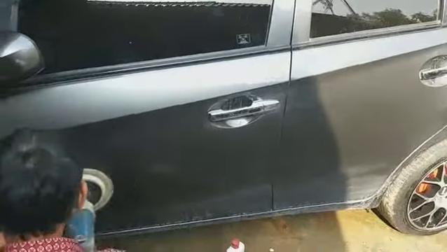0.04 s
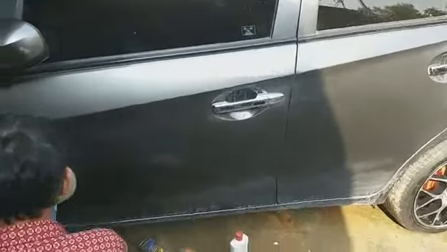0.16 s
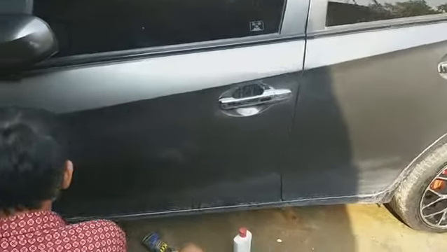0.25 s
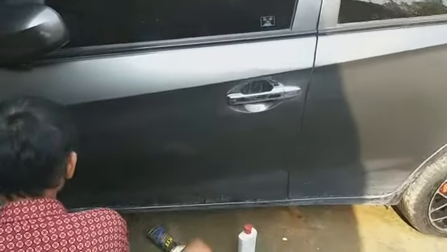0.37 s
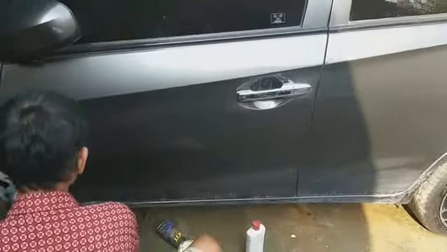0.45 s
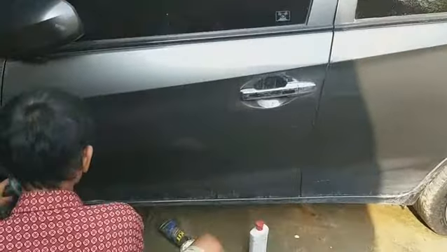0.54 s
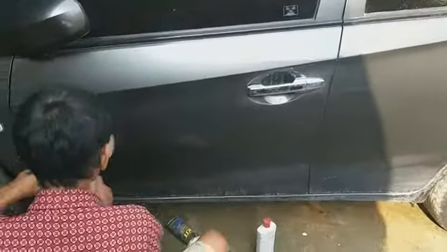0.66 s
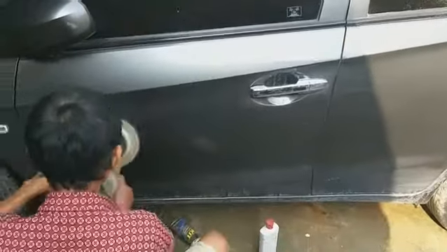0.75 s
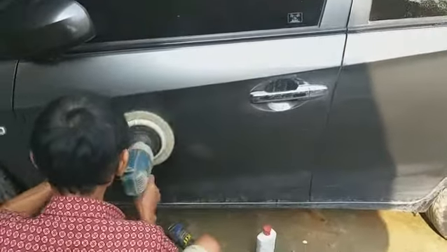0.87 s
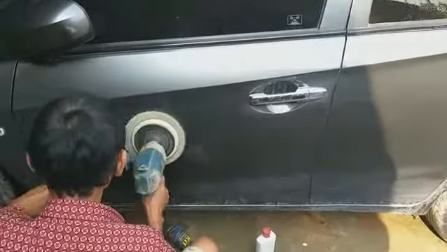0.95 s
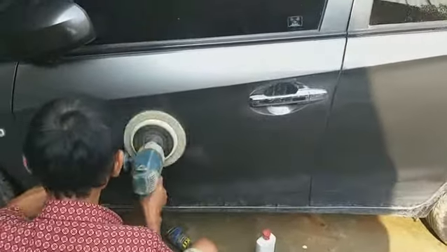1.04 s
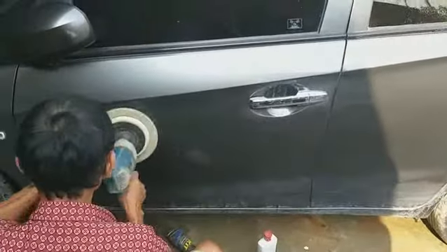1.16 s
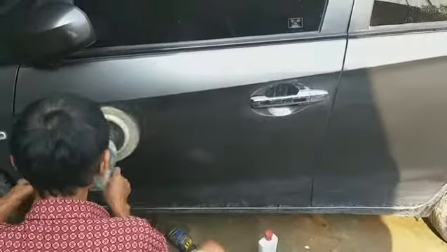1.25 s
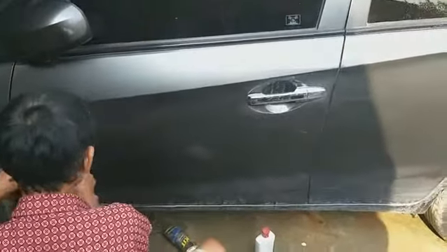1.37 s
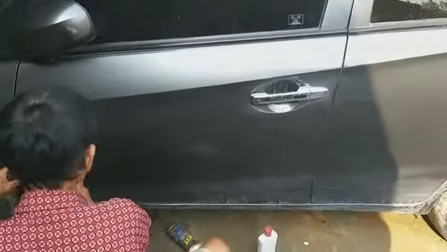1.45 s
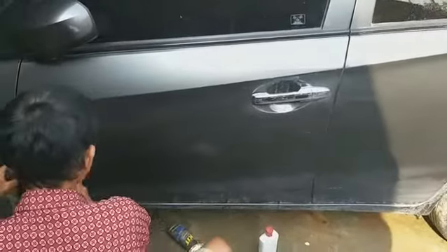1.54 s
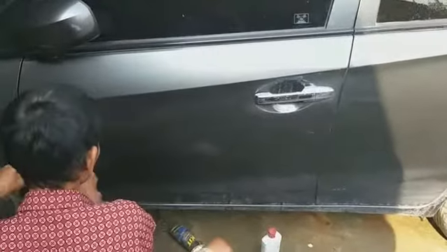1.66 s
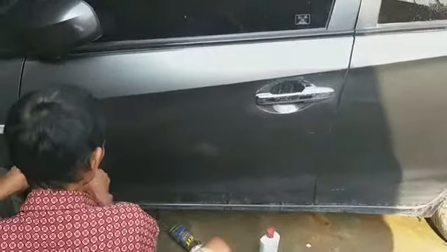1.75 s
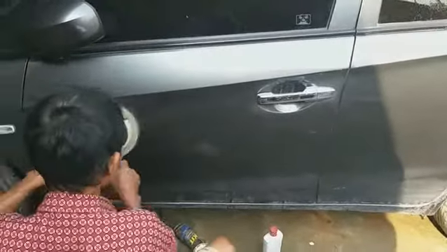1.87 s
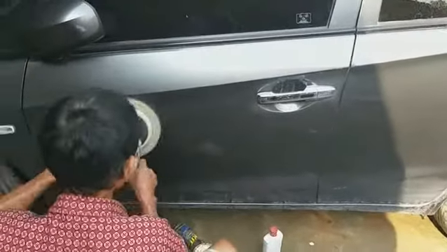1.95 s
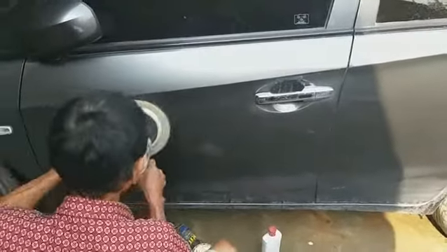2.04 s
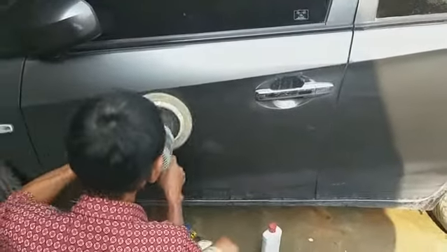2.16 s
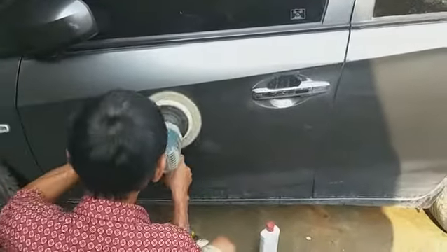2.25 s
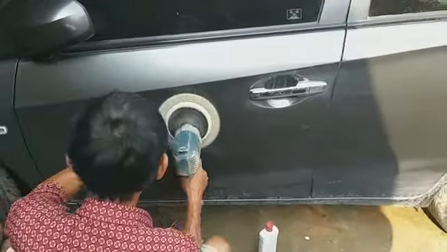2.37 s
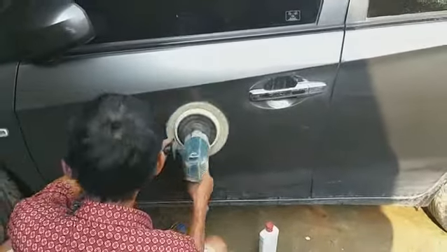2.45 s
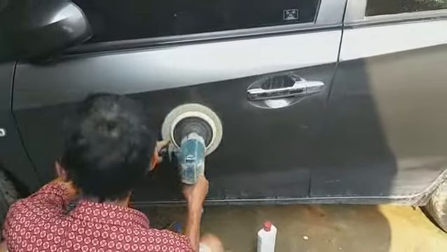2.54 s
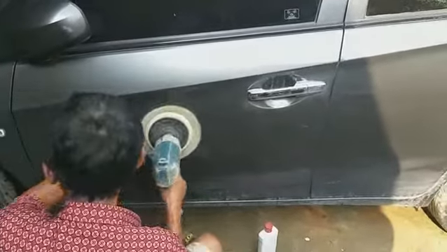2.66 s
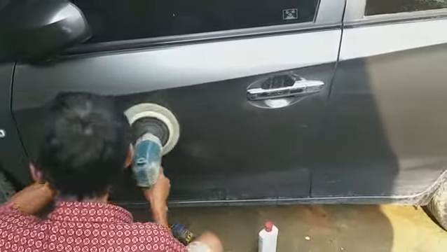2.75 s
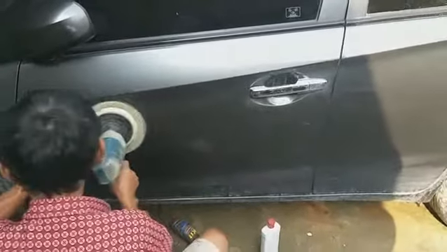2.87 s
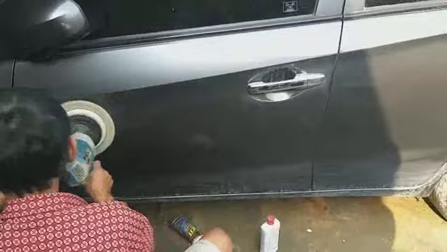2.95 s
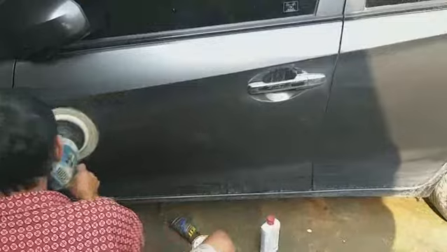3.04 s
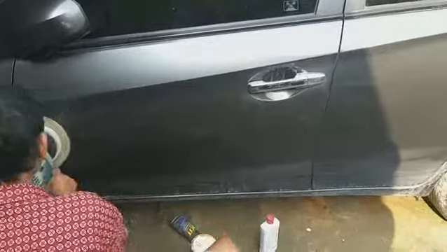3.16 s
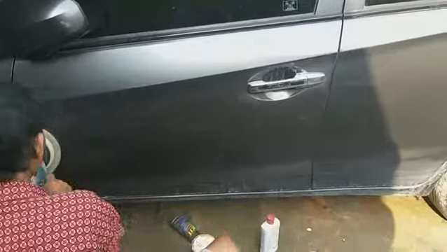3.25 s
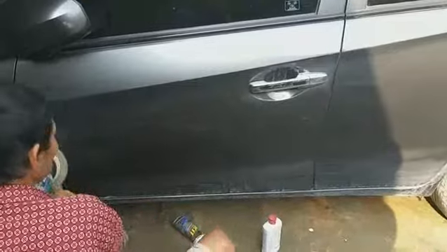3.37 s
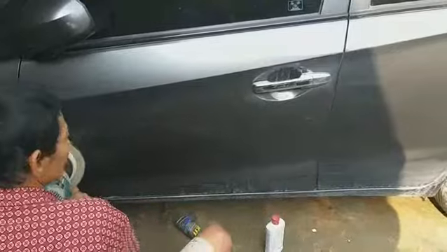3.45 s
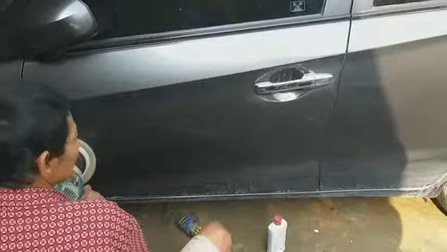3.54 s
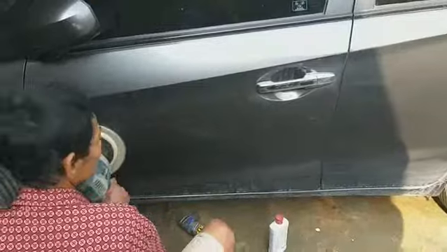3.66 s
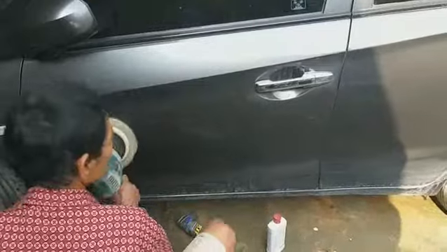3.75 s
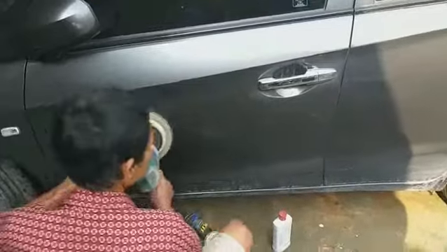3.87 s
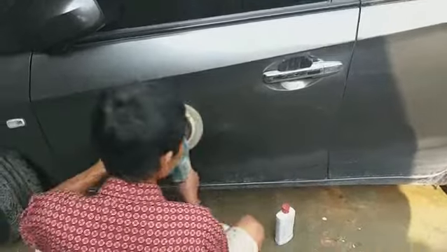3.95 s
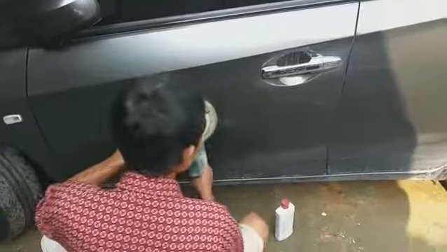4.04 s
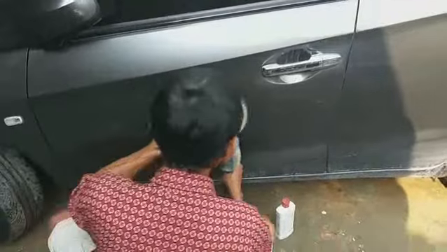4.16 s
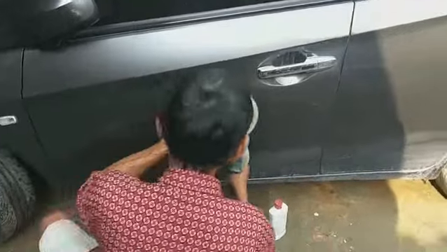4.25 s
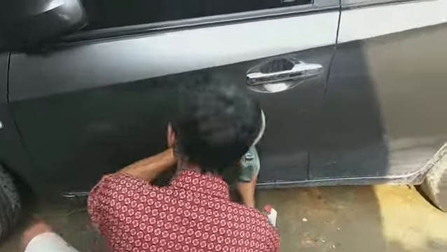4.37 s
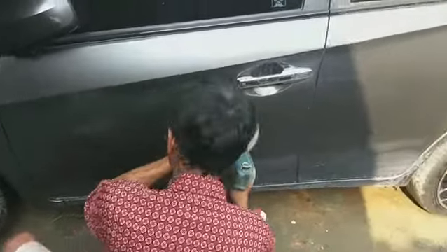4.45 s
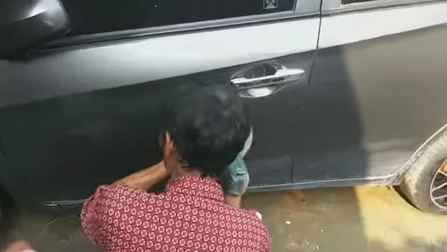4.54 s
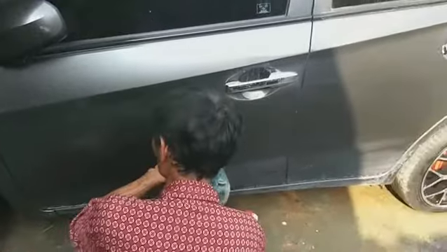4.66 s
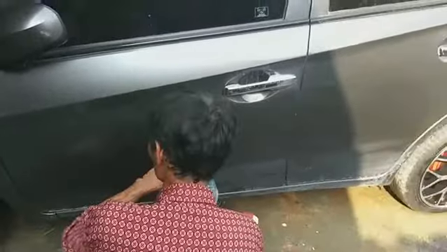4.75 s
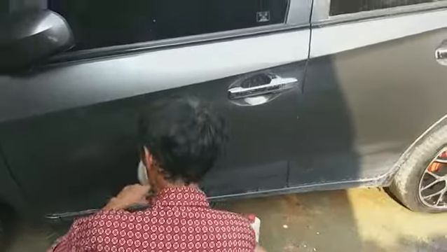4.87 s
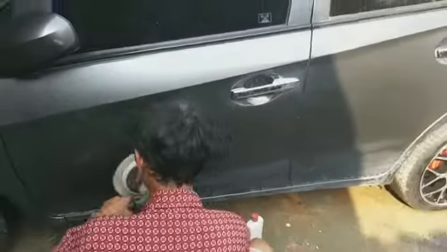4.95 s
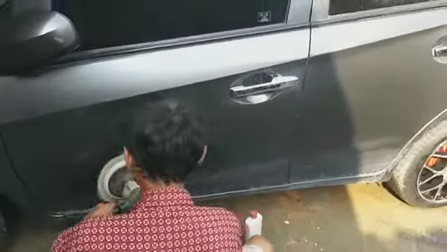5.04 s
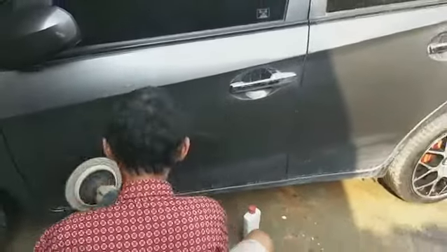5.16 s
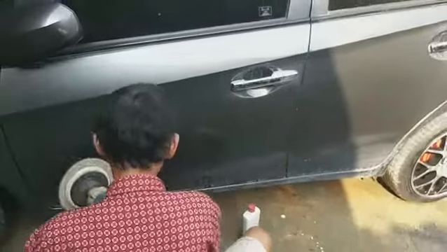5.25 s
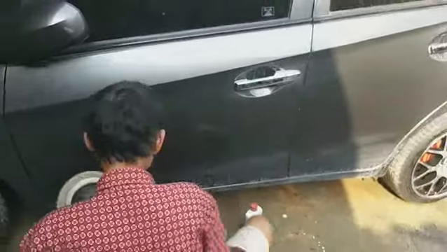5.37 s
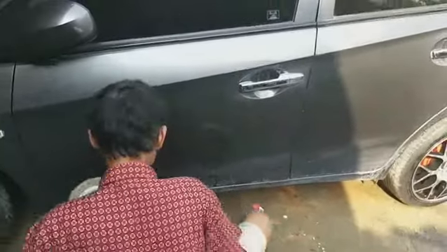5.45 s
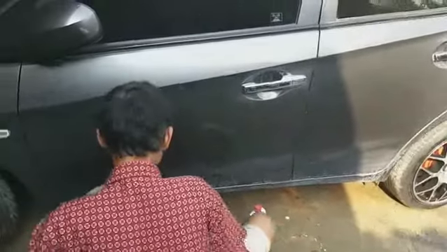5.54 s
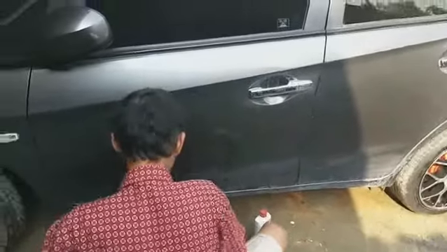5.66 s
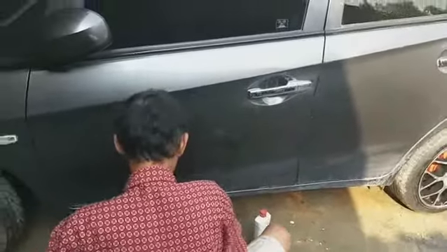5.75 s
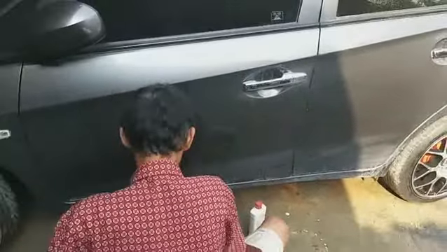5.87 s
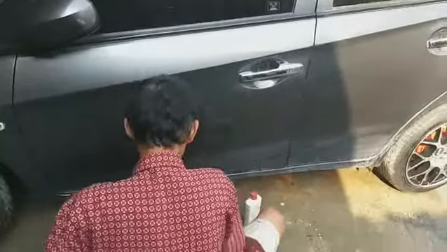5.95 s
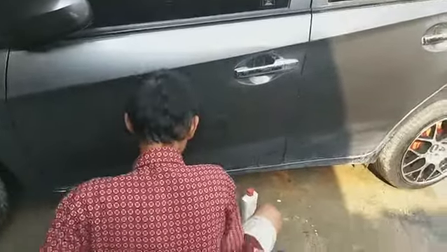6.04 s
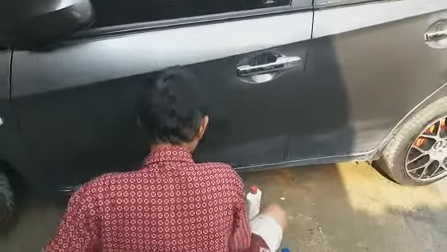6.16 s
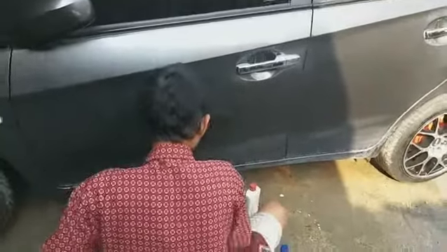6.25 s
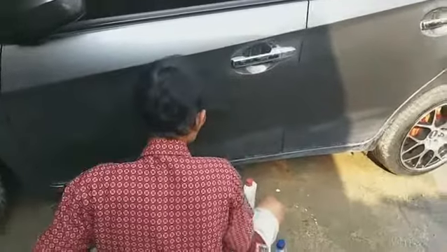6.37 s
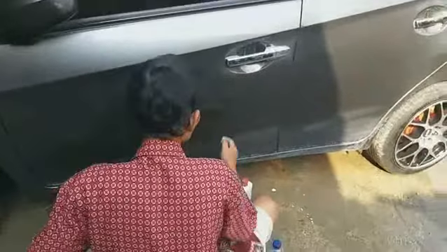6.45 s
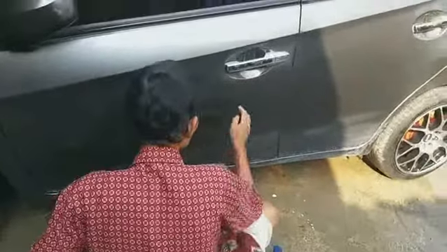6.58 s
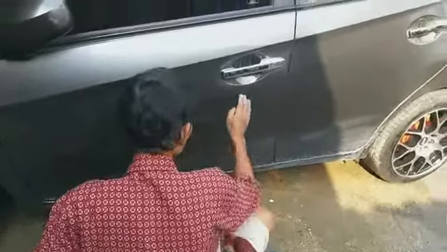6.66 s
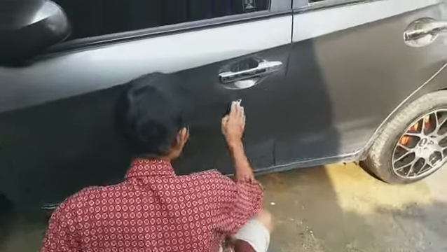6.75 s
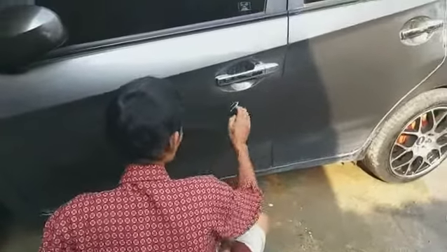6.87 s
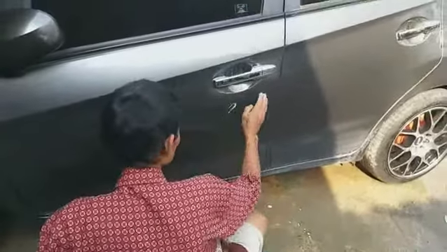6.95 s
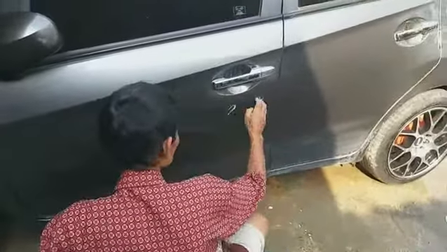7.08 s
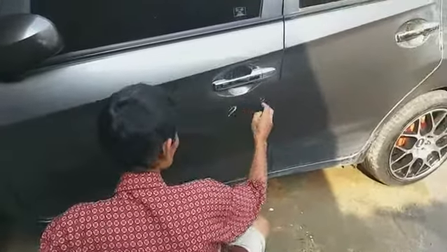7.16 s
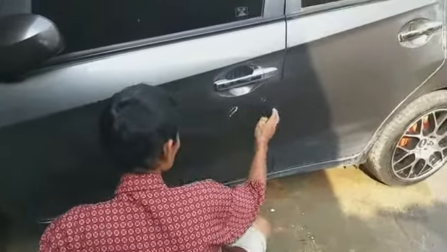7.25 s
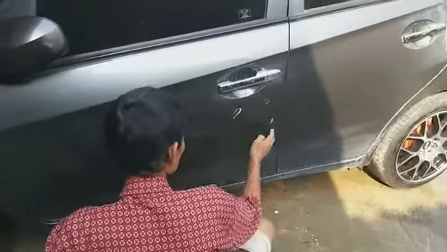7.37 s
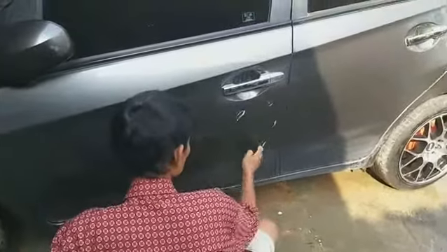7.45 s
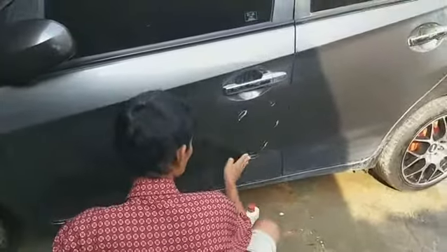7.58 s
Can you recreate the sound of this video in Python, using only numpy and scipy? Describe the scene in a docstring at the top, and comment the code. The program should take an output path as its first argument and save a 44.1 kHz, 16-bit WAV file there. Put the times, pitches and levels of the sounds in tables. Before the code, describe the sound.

An electric rotary polisher whines and hisses against a car door outdoors, its pitch wavering, then switches off and slowly runs down.

```python
"""An electric rotary polisher whines and hisses on a car door outdoors, then is switched off and runs down.
Its armature drives a bevel gear: teeth, slots and bearing sing at multiples of the shaft speed. Fan air and pad
friction are shaped noise that rings in the housing; a hollow noise band glides and a small knock comes late.
Two far engines, hums and street rumble lie behind; the microphones sit close together, so the stereo is narrow."""
import sys
import numpy as np
from scipy import signal
from scipy.fft import rfft, irfft, next_fast_len
from scipy.io import wavfile
from scipy.ndimage import uniform_filter1d, map_coordinates

SR = 44100
rng = np.random.default_rng(int(sys.argv[2]) if len(sys.argv) > 2 else 0)


def output_pcm(signal):
    """Save a mono or channel-first signal as 16-bit PCM at the path in sys.argv[1].

    Samples are clipped to [-1, 1] before scaling.
    """
    pcm = np.clip(np.atleast_2d(signal).T, -1, 1) * 32767
    wavfile.write(sys.argv[1], SR, np.round(pcm).astype(np.int16))


N = 335601  # length in samples


def amp(db):
    """Decibels to amplitude factor."""
    return 10 ** (np.asarray(db) / 20)


def unit(x):
    """Scale to an rms of 1."""
    return x / np.sqrt(np.mean(x ** 2, axis=-1, keepdims=True) + 1e-20)


def along(points, hz):
    """Read (Hz, value) points as a curve on a log frequency axis."""
    f, v = np.transpose(points)
    return np.interp(np.log(hz + 1), np.log(f + 1), v)


def curves(rows):
    """One value per sample for each column after the time."""
    s, *cols = np.transpose(rows)
    return [np.interp(np.arange(N) / SR, s, c) for c in cols]


def wobble(rate):
    """A smooth random curve with rate knots a second."""
    t = np.arange(0, N + 32, 32) / SR
    knots = rng.standard_normal(int(N * rate / SR) + 4)
    smooth = map_coordinates(knots, [t * rate])
    return np.interp(np.arange(N) / SR, t, smooth)


def filtered(x, response):
    """Multiply the spectrum of x by a response of frequency."""
    m = next_fast_len(N + 8192)
    return irfft(rfft(x, m) * response(np.fft.rfftfreq(m, 1 / SR)), m)[..., :N]


def modes(table, hz):
    """Magnitude of a set of resonances, their powers added."""
    return np.sqrt(sum(amp(2 * db) / (1 + (2 * (hz - c) / w) ** 2) ** 2 for c, w, db in table))


def noise(gain, patchy_db):
    """Coloured noise of rms 1 with narrow, lingering patches of gain: many small modes that shift."""
    z = signal.stft(rng.standard_normal(N + 1024), nperseg=1024)[2]
    field = uniform_filter1d(rng.standard_normal(z.shape), size=2, axis=0)  # across frequency
    field = uniform_filter1d(field, size=14, axis=1)  # across time
    patched = signal.istft(z * amp(patchy_db * field / field.std()), nperseg=1024)[1][:N]
    return unit(filtered(patched, gain))


# Street rumble fader. Each row: time in seconds, level in dB.
STREET = [(0, -40.5), (2.9, -41.5), (6.1, -42.5), (7.61, -46)]
# Tone of the rumble. Each row: frequency in Hz, density in dB per Hz before levelling.
RUMBLE = [(13, -70), (22, -40), (32, -52), (53, -19), (92, -10.5), (118, -10.5), (174, 0.5), (210, -5),
          (404, -7), (447, -11.5), (700, -11), (910, -28), (1540, -120)]


def street():
    """Broad rumble from far traffic: low noise under a slow fader."""
    level_db, = curves(STREET)
    return amp(level_db) * noise(lambda f: amp(along(RUMBLE, f)), patchy_db=1.5)


def swells(rows, unit_hz):
    """Wavering tones at multiples of unit_hz that rise to a peak and fall away."""
    swell_db = 11.5  # gained over the rise time, lost over the fall time
    t, total = np.arange(N) / SR, np.zeros(N)
    for multiple, s, rise, fall, db in rows:
        away = np.where(t < s, (s - t) / rise, (t - s) / fall)
        hz = multiple * unit_hz * (1 + .008 * wobble(5))
        level = amp(db - swell_db * away ** 2 + 2 * wobble(9))
        total += np.sqrt(2) * level * np.sin(2 * np.pi * np.cumsum(hz) / SR)
    return total


# First far engine, slower overall. Each row: time in seconds, firing rate in Hz.
SLOWING = [(0, 29.2), (1.0, 29.1), (1.3, 28), (1.8, 26.7), (2.1, 26.6), (3.1, 27.9)]
# Its orders swell in turn. Each row: order (multiple of firing rate), peak time, rise and fall in seconds,
# peak level in dB.
SLOWING_ORDERS = [(5, 1.1, 1.2, 2.6, -50), (6, 0.34, 0.21, 0.92, -40), (6, 1.08, 0.31, 0.61, -34),
                  (6, 1.7, 0.35, 0.59, -38), (6, 2.8, 1, 0.65, -45), (7, 0.91, 0.57, 0.38, -34.5),
                  (7, 1.6, 0.4, 0.23, -45.5), (8, 1.83, 0.55, 0.67, -44)]
# Second far engine, speeding up. Each row: time in seconds, firing rate in Hz.
SPEEDING = [(0, 38.4), (1.1, 39), (2, 40.6), (3.3, 41.5), (4.3, 43.2)]
# Each row: order (multiple of firing rate), peak time, rise and fall in seconds, peak level in dB.
SPEEDING_ORDERS = [(2, 1.8, 3, 2, -54), (7, 0.57, .3, 0.96, -44), (7, 1.76, 1.1, 0.28, -45),
                   (7, 3.23, 0.17, .9, -45.5)]
# Hums and one brief whistle. Each row: pitch in Hz, peak time, rise and fall in seconds, peak level in dB.
HUMS = [(202, 2.6, 0.52, 0.8, -46), (208.5, 3.2, 1, 0.8, -43), (175, 4.15, .6, 0.67, -44),
        (106, 4.33, 0.19, .3, -49.5), (108.4, 5.04, .15, 0.12, -47), (184, 5.03, .3, .25, -42.5),
        (147, 5.45, 0.35, 0.65, -47.5), (183, 5.55, 0.16, 0.087, -47), (1670, 5.87, 0.45, 0.24, -40),
        (181, 6.5, 0.21, 0.13, -41.5), (149, 6.2, 0.2, 0.17, -42.5), (184, 6.4, .4, 0.22, -51),
        (149, 6.75, .25, .5, -47.5), (180, 6.95, .2, 0.14, -49), (148, 7.55, 0.58, .3, -51.5),
        (177, 7.55, 0.25, .3, -49)]


def drone():
    """Far engines heard as multiples of their firing rates, plus other hums of the surroundings."""
    slowing = swells(SLOWING_ORDERS, *curves(SLOWING))
    speeding = swells(SPEEDING_ORDERS, *curves(SPEEDING))
    return slowing + speeding + swells(HUMS, 1)


def tick():
    """One small knock rings two close modes of the housing, which beat as they die away."""
    start_s, level_db, modes_hz = 7.26, -20, (2430, 2720)
    out, t = np.zeros(N + SR), np.arange(SR // 10) / SR
    tones = sum(np.sin(2 * np.pi * hz * t) for hz in modes_hz)
    decay = amp(level_db - 60 * t / .022)  # 60 dB in 22 ms
    attack = 1 - np.exp(-t / .0006)
    out[round(start_s * SR):][:len(t)] = tones * decay * attack
    return out[:N]


# Armature speed: sags as the pad is pressed on, then coasts down. Each row: time in seconds, shaft speed in Hz.
SHAFT = [(0, 343.8), (.15, 343.5), (.36, 339.1), (.68, 337.4), (1.2, 346.4), (1.33, 345), (1.8, 325.2),
         (2.02, 321.8), (2.52, 331.4), (2.95, 342.6), (3.12, 341), (3.72, 347.2), (4.2, 349.6),
         (4.37, 349.6), (4.52, 332.8), (4.68, 337.9), (5.0, 340.8), (5.28, 320.4), (5.7, 295.2),
         (6.48, 258.9), (6.96, 238.3), (7.61, 213.5)]
GEAR_RATIO = 4  # armature turns per pad turn


def shaft_speed():
    """Turns per second of the armature, and its running angle in radians."""
    shaft_hz, = curves(SHAFT)
    return shaft_hz, 2 * np.pi * np.cumsum(shaft_hz) / SR


# Hollow band that shifts as the tool moves. Each row: time in seconds, centre in Hz, level in dB.
HOLLOW = [(0, 1600, -47), (.45, 1600, -36), (.55, 1950, -33), (.95, 1623, -44), (1.3, 1820, -31),
          (1.7, 1900, -29.5), (2.05, 1800, -41), (2.4, 2330, -31), (2.5, 1654, -34), (3.2, 2000, -34.5),
          (3.6, 1710, -33.5), (4.4, 1720, -43), (4.85, 1850, -32.5), (5.85, 1702, -69), (6.4, 2000, -115),
          (6.8, 2599, -38), (7.61, 2573, -45)]


def hollow():
    """Slow noise on a gliding carrier makes a band about its centre; it rattles once per pad spindle turn."""
    hz, db = curves(HOLLOW)
    carrier = 2 * np.pi * np.cumsum(hz) / SR
    spindle = shaft_speed()[1] / GEAR_RATIO
    rattle = unit(amp(3 * np.sin(spindle) + 2.5 * wobble(45)))
    a, b = unit(filtered(rng.standard_normal((2, N)), lambda f: modes([(0, 360, 0)], f)))
    return amp(db) * rattle * (a * np.sin(carrier) + b * np.cos(carrier))


# Treble resonances of the housing. Each row: centre in Hz, width in Hz, gain in dB.
EDGES = [(10420, 88, 2), (10430, 94, 2.3), (11450, 220, 4), (11640, 110, 4.9), (13500, 150, 4),
         (14100, 200, 5), (15430, 90, 6.9)]


def housing(hz):
    """Treble response of the housing: resonances standing on a flat floor."""
    return np.hypot(1, modes(EDGES, hz))


def slowness(shaft_hz):
    """0 at 330 Hz shaft speed and above, 1 at 230 Hz and below, late in the run-down."""
    return np.clip((330 - shaft_hz) / 100, 0, 1)


# Hiss, louder when the tool comes out from behind the worker. Each row: time in seconds, body level in dB,
# upper housing ring in dB re that level, treble in dB re that level.
HISS = [(0, -17, -14, -12), (.1, -20.5, -12.5, -12), (.7, -19.5, -14, -8), (.8, -15.5, -9, -9.5),
        (1.0, -15.5, -13.5, -8), (1.18, -17.5, -4, -9.5), (1.31, -19.5, -15, -10), (2.1, -19.5, -8, -9),
        (2.27, -16.5, -11, -9), (2.45, -16, -11.5, -7), (2.65, -16, -10, -9), (2.9, -17, -8.5, -9),
        (3.24, -20, -11.5, -7), (3.75, -17.5, -6, -7.5), (3.95, -16, -9, -8.5), (4.36, -17, -19, -9),
        (4.43, -17.5, -14, -8.5), (4.72, -20.5, -11, -8), (4.9, -19.5, -13.5, -10.5),
        (5.45, -27, -17, -10.5), (6.3, -28.5, -16, -9.5), (7.05, -30, -11.5, -8), (7.61, -30.5, -16, -10.5)]
# The four hiss tones below. Each row: frequency in Hz, density in dB per Hz before levelling.
# Low mids:
LOW_MIDS = [(260, -67), (450, -9), (520, -20.5), (635, -12.5), (924, -2), (1320, -7), (1600, -1.5),
            (2140, -9.5), (2800, -4.5), (3640, -14), (6160, -120)]
# Body at working speed:
BODY = [(1060, -30.5), (1800, -3.5), (2120, -4), (3040, 3.5), (3850, 3.5), (4590, 4), (5200, 1),
        (6970, -6.5), (8000, -10), (10400, -34), (17600, -120)]
# Body at low speed:
BODY_SLOW = [(1060, -54), (1750, -24), (2040, -1), (2270, -2), (2560, 3), (3000, -5.5), (3100, 0.5),
             (5140, -4.5), (6510, -14), (7240, -21), (8000, -14), (10400, -44), (17600, -120)]
# Treble:
TREBLE = [(4120, -28), (7000, -2), (8180, -4.5), (8720, 1.5), (10100, -5), (11500, -7.5), (12900, -13.5),
          (13800, -16), (15500, -18)]
# Ringing housing modes, lowest first. Each row: centre in Hz, width in Hz, relative gain in dB.
RING = [(7636, 160, 2), (8030, 90, 0), (8230, 110, -2.5)]


def hiss(turns, slow):
    """Fan air and pad friction: noise bands that ring in the housing and beat with shaft, bearing and pad."""
    level_db, ring_db, treble_db = curves(HISS)
    # the air noise sinks in pitch as the fan slows
    body = np.sqrt(1 - slow) * noise(lambda f: amp(along(BODY, f)), patchy_db=2.0)
    body = body + np.sqrt(slow) * noise(lambda f: amp(along(BODY_SLOW, f)), patchy_db=3.0)

    low_ring_db = -17.5 + 4.5 * slow  # re level; the lowest mode stands out more as the motor slows
    ring = amp(ring_db) * noise(lambda f: modes(RING[1:], f), patchy_db=2.2)
    ring = ring + amp(low_ring_db) * noise(lambda f: modes(RING[:1], f), patchy_db=3)

    treble = noise(lambda f: amp(along(TREBLE, f)) * housing(f), patchy_db=2.2)
    treble = amp(treble_db) * amp(.8 * wobble(8)) * treble

    low_db = -32 + 0.22 * (level_db - level_db.mean())  # low mids follow a share of the level's swing
    low = amp(low_db) * noise(lambda f: amp(along(LOW_MIDS, f)), patchy_db=2.5)

    beat = 1 + .07 * np.sin(turns) + .07 * np.sin(1.717 * turns) + .04 * np.sin(turns / GEAR_RATIO)
    shake = amp(0.27 * wobble(7))  # the hand-held tool trembles
    return beat * shake * (amp(level_db) * (body + ring + treble) + low)


def whine(turns, order, db, flutter_db):
    """A tone on a shaft order whose strength and phase flicker with the play in the gears."""
    play, drift_db = .022, 1.5  # radians per order; slower wander as the tool is tilted
    phase = order * turns + rng.uniform(0, 2 * np.pi) + play * order * wobble(35)
    level = amp(db + flutter_db * wobble(26) + drift_db * wobble(9))
    return np.sqrt(2) * level * np.sin(phase)


BEARING, MESH, SLOTS = 9.29, 11, 12  # events per shaft turn
SWITCH_OFF = 5.07  # s
# Main whines under power. Each row: time in seconds, bearing, gear mesh, armature slots and third mesh harmonic,
# each in dB.
DRIVEN = [(0, -37, -32, -27, -48), (.25, -32, -25, -35, -44), (.42, -30, -27, -25, -47),
          (.6, -30.5, -31, -43, -48), (.72, -29, -26.5, -32, -44), (.88, -26, -18, -38, -37),
          (1.07, -24.5, -27, -34, -46), (1.25, -47, -30, -31, -46), (1.5, -30, -35, -29.5, -42),
          (1.68, -28.5, -33, -27, -46), (1.8, -23, -27, -33, -39), (2.05, -28, -27.5, -37, -35),
          (2.28, -22, -17.5, -25, -34.5), (2.42, -27, -27, -36, -31), (2.6, -24, -20.5, -24, -35),
          (2.85, -43, -23.5, -35, -48), (3.3, -31, -36, -32, -46), (3.65, -32.5, -29.5, -30, -50),
          (3.8, -32, -34, -29, -42), (4.0, -31, -34, -20.5, -37), (4.3, -23, -23, -22.5, -55),
          (4.4, -29, -18, -22, -52), (4.49, -32, -25, -30, -43), (4.57, -34, -36, -36, -33),
          (4.8, -31, -32, -28, -42), (4.9, -35, -33, -35, -44), (5.02, -31, -27.5, -43, -39)]
# Weaker whines under power, moving with the hiss. Each row: shaft order, level in dB re hiss.
LOADED = [(7.08, -26.5), (8.29, -27.5), (10, -35), (13, -30), (22, -36), (22.25, -40), (23, -48),
          (23.46, -29), (32, -42), (32.75, -43), (42, -50), (45, -41), (47, -30)]
# Whines that go on while coasting. Each row: shaft order, level in dB re hiss.
FREE = [(1, -32.5), (24, -29.5), (48, -29)]
# Resonances that the coasting slot whine falls through. Each row: centre in Hz, width in Hz, gain in dB re hiss.
PASSED = [(4000, 120, -7), (3800, 200, -8), (3440, 450, -7.5), (3220, 50, -9), (3100, 100, -3.5),
          (2915, 55, -9)]


def whines(shaft_hz, turns, slow):
    """Gear teeth, bearing and armature slots sing at multiples of the shaft speed."""
    t = np.arange(N) / SR
    bearing_db, mesh_db, slots_db, third_db = curves(DRIVEN)
    level_db = curves(HISS)[0]

    gears = whine(turns, BEARING, bearing_db, 2.15)
    gears = gears + whine(turns, MESH, mesh_db, 2.94)
    gears = gears + whine(turns, 3 * MESH, third_db, 4)
    fourth = whine(turns, 4 * MESH, third_db - 14, 4.5)
    weaker = sum(whine(turns, order, level_db + db, 1.2) for order, db in LOADED)
    gears = gears + filtered(fourth + weaker, housing)
    load = np.clip((SWITCH_OFF - t) / .04, .03, 1)  # the teeth unload when the switch opens

    coasting = amp(level_db) * modes(PASSED, SLOTS * shaft_hz)
    slots = np.where(t < SWITCH_OFF, amp(slots_db), coasting)
    rotor = slots * whine(turns, SLOTS, 0, 2.5)
    # loose teeth chatter once per pad turn at low speed
    chatter_db = level_db - 15 + 6 * np.sin(turns / GEAR_RATIO)
    rotor = rotor + slow ** 2 * whine(turns, MESH, chatter_db, 3)
    rotor = rotor + sum(whine(turns, order, level_db + db, 3.6) for order, db in FREE)
    return load * gears + rotor


def polisher():
    """One armature speed drives both the whines and the beating hiss."""
    shaft_hz, turns = shaft_speed()
    slow = slowness(shaft_hz)
    return whines(shaft_hz, turns, slow) + hiss(turns, slow)


# Level difference of the two ports. Each row: frequency in Hz, share added left and taken right (no unit).
LEAN = [(1200, 0.0038), (1650, 0.093), (2400, -0.021), (3400, 0), (8600, 0), (9600, -0.17), (10600, 0)]
# Scattered sound that differs between the ports. Each row: frequency in Hz, gain in dB.
APART = [(1100, -70.5), (1600, -16.5), (2300, -16.5), (3200, -30.5), (5000, -66), (8500, -48.5), (9500, -7),
         (10600, -45)]


def scene():
    """Near-mono pickup; the two ports differ in two bands, partly in level, partly by scattered sound."""
    mid = street() + drone() + tick() + hollow() + polisher()
    t = np.arange(SR // 4) / SR
    scatter = rng.standard_normal(len(t)) * amp(-60 * t / .25)  # dies 60 dB in 0.25 s
    scattered = signal.fftconvolve(mid, scatter / np.linalg.norm(scatter))[:N]
    side = filtered(mid, lambda f: along(LEAN, f))
    side = side + filtered(scattered, lambda f: amp(along(APART, f)))
    return np.array([mid + side, mid - side])


def record(dry):
    """The highest peaks are rounded off; nothing is kept above the band limit."""
    top_hz = 15590  # silent from here up, fading in over the 130 Hz below
    rounded = dry / (1 + np.abs(dry / .95) ** 8) ** (1 / 8)
    return filtered(rounded, lambda hz: np.clip((top_hz - hz) / 130, 0, 1) ** 3)


dry = scene()
out = record(dry)
output_pcm(out)
```